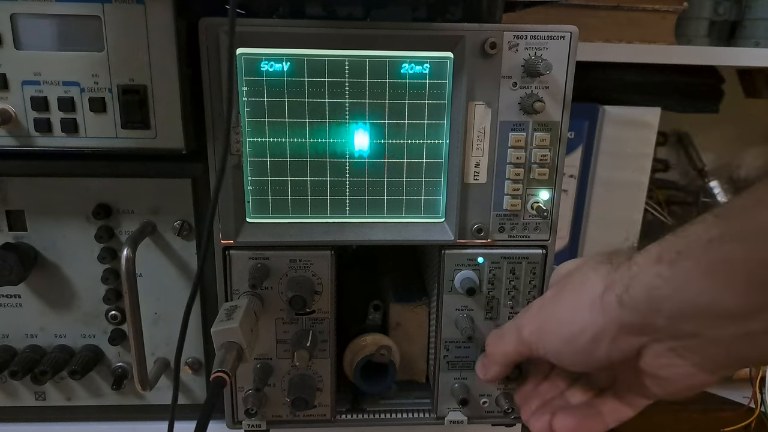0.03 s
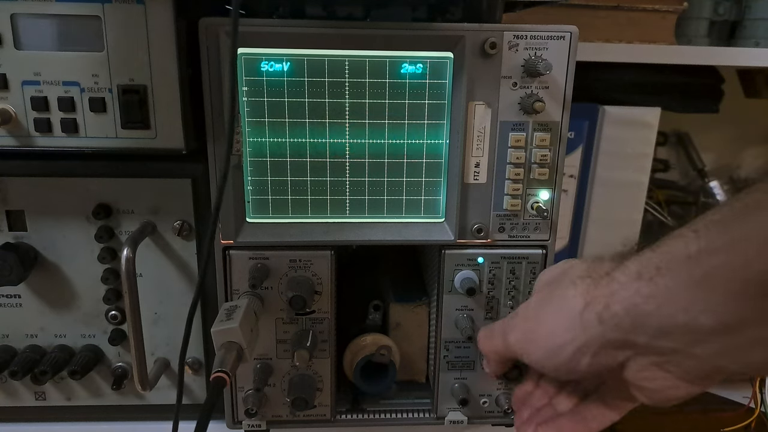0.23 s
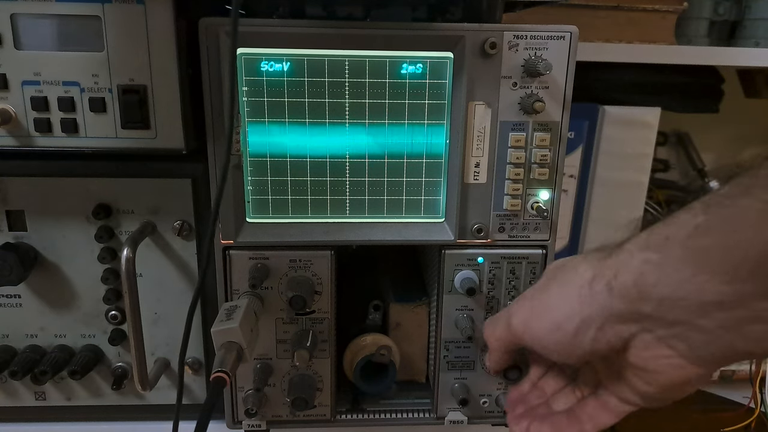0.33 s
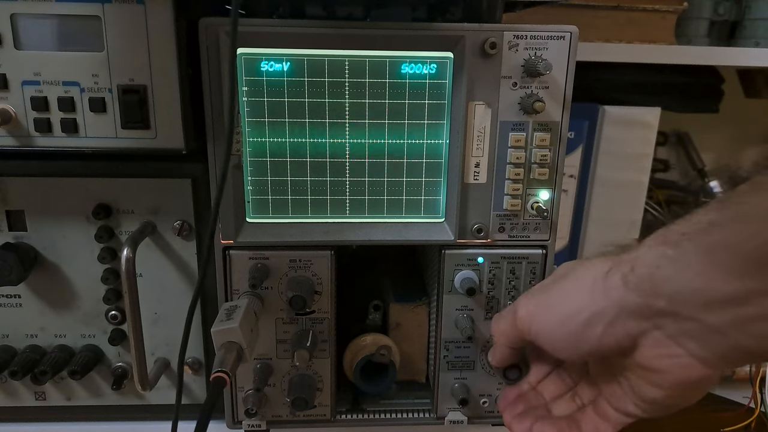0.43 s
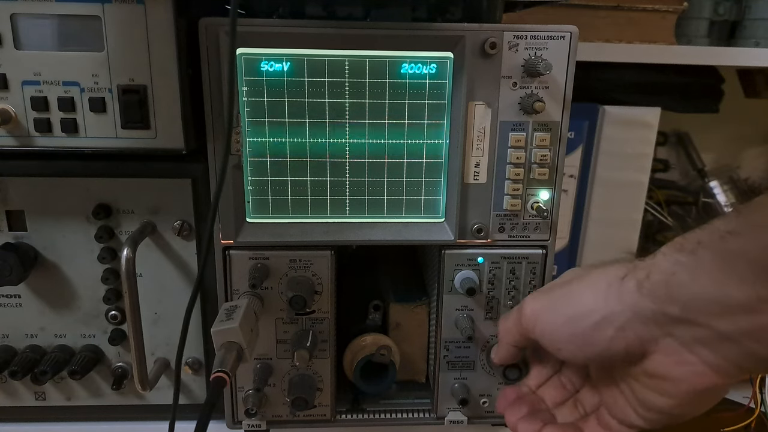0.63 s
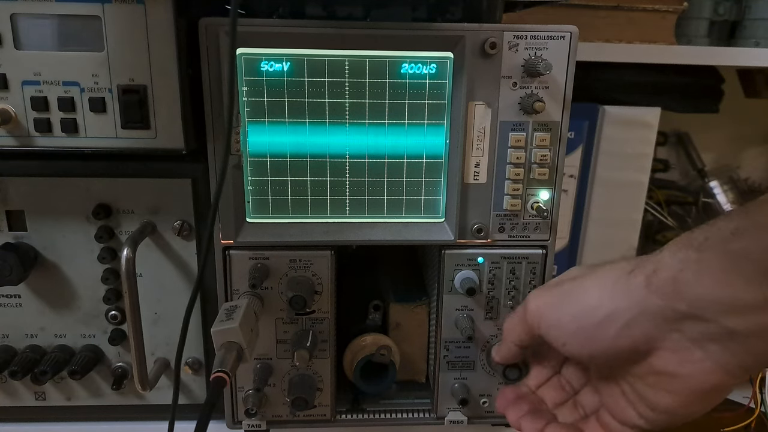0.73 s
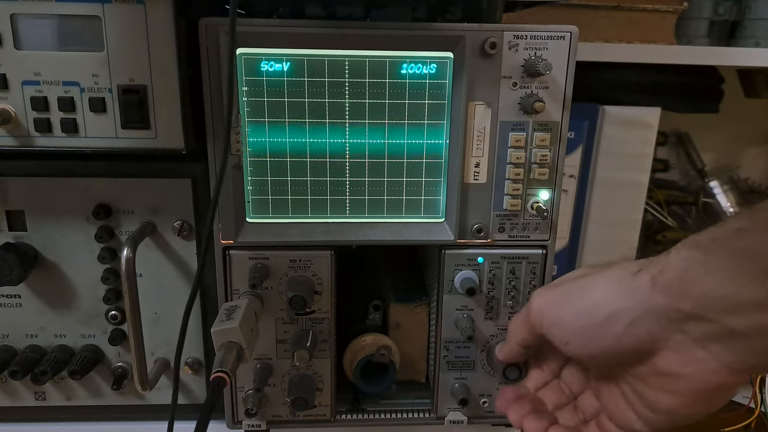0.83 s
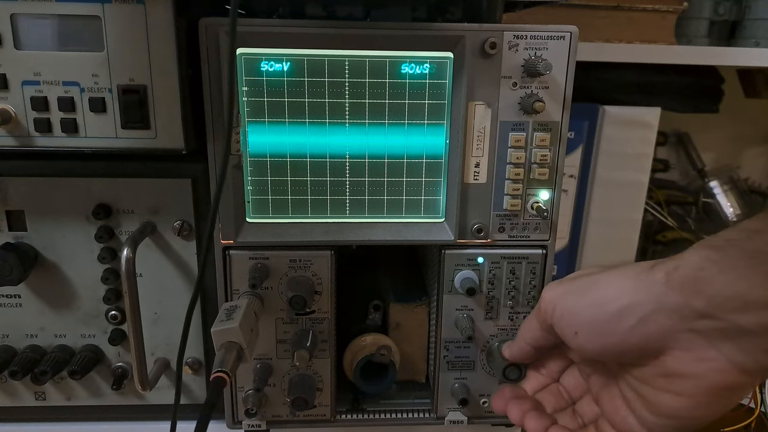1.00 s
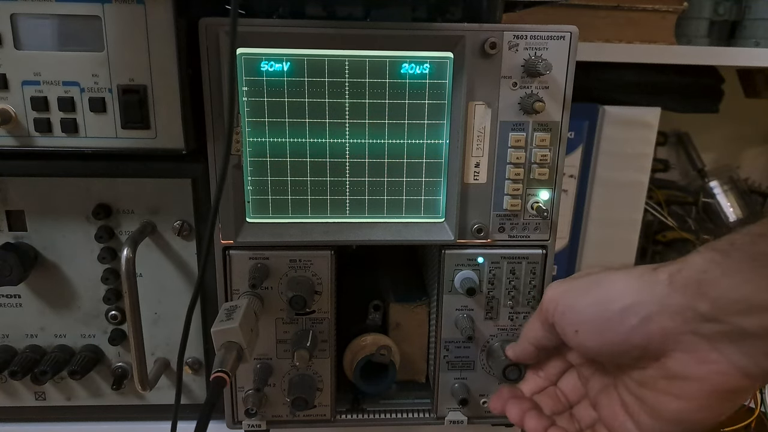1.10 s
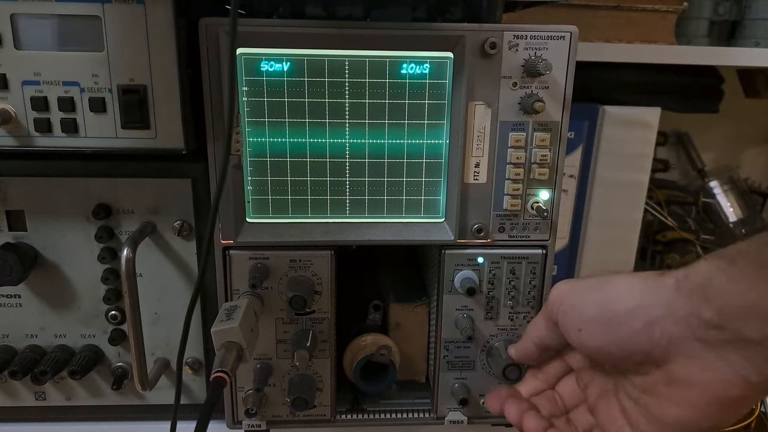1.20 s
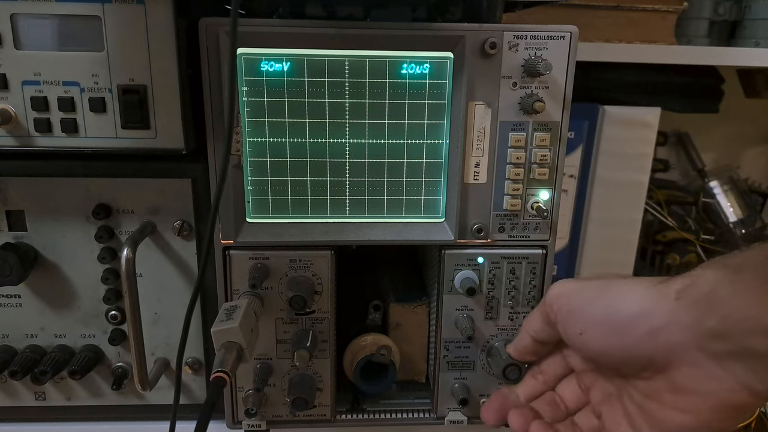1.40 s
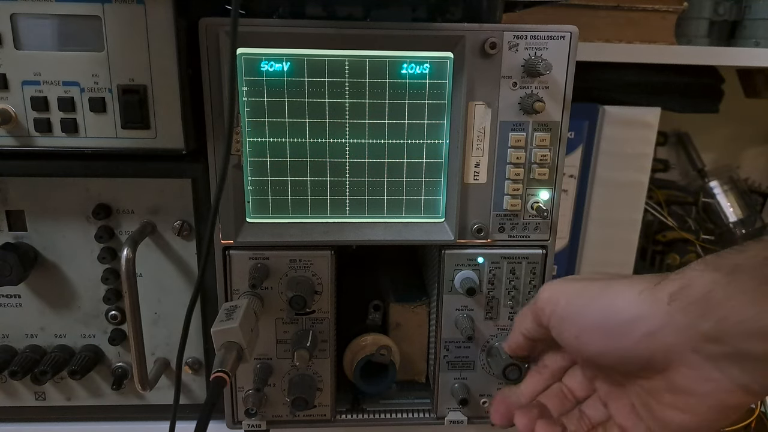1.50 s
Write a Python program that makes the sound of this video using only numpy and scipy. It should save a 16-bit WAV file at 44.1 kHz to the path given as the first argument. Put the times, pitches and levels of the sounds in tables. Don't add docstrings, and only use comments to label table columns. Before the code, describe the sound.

A rotary switch on a bench instrument clicks in a small workshop. After a faint touch at 0.1 s with a low air thump, a hard, bright double snap lands at 0.21 s, then a softer click at 0.27. Faint clicks follow at 0.39, 0.49 and 0.62, then clearer clacks at 0.87, 0.95, 1.11 and 1.25, with brief reflections over quiet low hum.

```python
import sys
import numpy as np
from scipy import signal
from scipy.io import wavfile

SR = 44100
rng = np.random.default_rng(int(sys.argv[2]) if len(sys.argv) > 2 else 0)


def volts(x):
    e = np.asarray(x, float) / 20
    return 10 ** e


def to_wav(sig):
    pcm = np.clip(np.atleast_2d(sig), -1, 1) * 32767
    pcm = np.round(pcm).astype(np.int16)
    wavfile.write(sys.argv[1], SR, pcm.T)


N = 68355

CONTACT_S = [.0935, .2128, .2206, .268, .3909, .3953, .4853, .6200, .8724, .9510, 1.1143, 1.2454]
# peak level in dB, then spring, wafers and case in dB relative to it.
STRENGTH = [(-42.5, -26.5, -8, 3), (-12.5, -13, -16, -14.5), (-12.5, -10.5, -16.5, -9),
            (-25.5, -13, -12, -4.5), (-35.5, -5.5, -13, -10), (-33.5, -6.5, -3.5, -2.5),
            (-28.5, -8.5, -6, -7), (-27, -9.5, -8, -5), (-19.5, -9, -12, -6.5), (-22, -7.5, -10, -7),
            (-18.5, -11, -13, -7), (-24, -11.5, -9.5, -7)]
# frequency in Hz, width in Hz, level in dB.
SPRING = [(4450, 200, -6), (4820, 120, -1), (5390, 250, -4), (6200, 250, -7), (6880, 170, -2),
          (7900, 350, -9), (11100, 250, -5), (12800, 250, -3), (13400, 300, -5)]
# frequency in Hz, width in Hz, level in dB.
WAFER = [(760, 45, -10), (912, 50, -7), (975, 45, -5), (1225, 60, -11), (1600, 120, -9), (1870, 80, -7),
         (2045, 70, -5), (2250, 80, -7), (2490, 80, -5), (2850, 150, -5), (3220, 150, -5)]
# frequency in Hz, width in Hz, level in dB.
CASE = [(129.7, 26.3, -4.5), (165.8, 21, -4.5), (211.2, 27, -4.5), (240, 21, -4.5), (281.9, 20.2, -2.5),
        (367.9, 25, -3.5), (505.5, 23.5, -5), (618.5, 24, -12)]
SWELL_S = [0.00041, .003, 0.018]
RIGHT_DB = [3, 0, -2.5]
# start in seconds, peak level in dB.
TICKS = [
    (.2127, -17),
    (.2205, -15),
    (.391, -35),
    (.4855, -30),
    (.6206, -26),
    (.8727, -21),
    (.9516, -25),
    (1.1146, -20),
    (1.2457, -27),
]
# frequency in Hz, level in dB.
SCATTER = [(120, -13), (500, -1), (1400, 4), (2600, 0), (3800, -1.5), (6000, -3.5), (9500, -5.5),
           (13000, -4), (16000, -33.5)]
# frequency in Hz, time to fall 60 dB in seconds.
ROOM_T60 = [(150, 0.34), (600, 0.44), (1400, 0.29), (2700, 0.38), (4000, 0.31), (9700, 0.27), (15000, 0.23)]
# frequency in Hz, left minus right in dB.
SIDE_BIAS = [(60, 4.5), (180, 3), (550, -3.5), (1650, -2.5), (4970, -6), (15000, -8)]
# frequency in Hz, left-right correlation from -1 to 1.
LIKENESS = [(60, 0.82), (180, 1), (550, 0.67), (1650, 0.025), (4970, -0.0053), (15000, 0.3)]
# start in seconds, level in dB, swing in Hz, length in seconds.
THUMPS = [
    (.110, -36, 75, .022),
    (.132, -36, 52, .04),
    (1.165, -49, 68, .045),
]
# frequency in Hz, density in dB per Hz.
HUM = [(24, -29), (40, -20), (91, -17), (305, -7), (382, -13), (585, -19), (1210, -24), (1520, -47.5),
       (16000, -51.5)]
BAND_EDGES_HZ = 45 * 2 ** (np.arange(0, 26.5) / 3)

SPRING_DB, WAFER_DB, CASE_DB = 10, 10.5, -2
CHATTER_S, WAFER_CHATTER_S, CASE_SHAKE_S = .0009, .0037, .03
CHATTER_LOSS_DB, STRIKE_SPREAD_DB = 6, 2.5
RIGHT_LAG_S = .0002
TICK_HZ, TICK_WIDTH_HZ = 13000, 1700
SCATTER_DB, SCATTER_T60_S, SCATTER_RISE_CYCLES = -1, 0.067, 9.3
ROOM_DB = -5
ECHO_PITCH_DB, ECHO_BLUR = 11, 1.3
RUMBLE_DB, RUMBLE_HZ = -70.5, 73
HUM_DB, HUM_FLICKER_DB = -57.5, 2
TOP_HZ = 15900


def rms_one(x):
    return x / np.sqrt(np.mean(x ** 2) + 1e-20)


def at_hz(points, hz):
    table_hz, values = np.transpose(points)
    return np.interp(np.log(hz), np.log(table_hz), values)


def resonate(x, hz, width_hz):
    r, w = np.exp(-np.pi * width_hz / SR), 2 * np.pi * hz / SR
    return signal.lfilter([0, np.sin(w)], [1, -2 * r * np.cos(w), r * r], x + 1e-18)


def stereo_bands(size):
    white = rng.standard_normal((2, 2, size))
    for k, (low, high) in enumerate(zip(BAND_EDGES_HZ, BAND_EDGES_HZ[1:])):
        band = signal.butter(2, [low, high], "band", fs=SR, output="sos")
        mid, side = signal.sosfilt(band, white[k % 2])
        hz = np.sqrt(low * high)
        alike = np.clip(at_hz(LIKENESS, hz), -1, 1)
        pair = np.sqrt(1 + alike) * mid + np.sqrt(1 - alike) * side * [[1], [-1]]
        yield hz, pair * volts(at_hz(SIDE_BIAS, hz) / 2 * np.array([[1], [-1]]))


def ringing_part(modes, column, spacing_s, swell_s):
    rows = np.column_stack([CONTACT_S, STRENGTH])
    gaps = rng.uniform(.4, 1.6, (len(rows), 4)) * spacing_s
    bounce_s = rows[:, :1] + np.cumsum(gaps, axis=1) - gaps[:, :1]
    where = (bounce_s * SR).astype(int)
    bounce_db = rows[:, [1]] + rows[:, [column]] - CHATTER_LOSS_DB * np.sqrt(np.arange(4))
    out = np.zeros((2, N))
    for hz, width_hz, mode_db in modes:
        clicks = np.zeros(N + SR)
        strike_db = STRIKE_SPREAD_DB * rng.standard_normal((len(rows), 1))
        signs = rng.choice([-1, 1], where.shape)
        np.add.at(clicks, where, volts(bounce_db + mode_db + strike_db) * signs)
        ring = resonate(clicks[:N], hz, width_hz)
        swelled = resonate(ring, hz, 1 / (np.pi * swell_s)) * 2 / (swell_s * SR)
        lag = int(RIGHT_LAG_S * SR) + rng.integers(0, 12) * (hz > 1000)
        out += [swelled, np.roll(swelled, lag)]
    return out / len(modes) ** .5


def switch():
    spring = volts(SPRING_DB) * ringing_part(SPRING, 2, CHATTER_S, SWELL_S[0])
    wafers = volts(WAFER_DB) * ringing_part(WAFER, 3, WAFER_CHATTER_S, SWELL_S[1])
    case = volts(CASE_DB) * ringing_part(CASE, 4, CASE_SHAKE_S, SWELL_S[2])
    side = volts(np.array(RIGHT_DB)[:, None, None] / 2 * [[-1], [1]])
    return side[0] * spring + side[1] * wafers + side[2] * case


def high_ticks():
    s, db = np.transpose(TICKS)
    clicks = np.zeros(N)
    clicks[(s * SR).astype(int)] = volts(db)
    ping = resonate(resonate(clicks, TICK_HZ, TICK_WIDTH_HZ), TICK_HZ, TICK_WIDTH_HZ)
    ping = ping * 2 * np.pi * np.e * TICK_WIDTH_HZ / SR
    return np.array([ping, .3 * np.roll(ping, 20)])


def reflections():
    rows = np.column_stack([CONTACT_S, STRENGTH])
    where = (rows[:, 0] * SR).astype(int)
    out = 0
    for hz, pair in stereo_bands(N):
        share_db = [at_hz([(400, case), (900, wafer), (3200, wafer), (4600, spring)], hz)
                    for spring, wafer, case in rows[:, 2:]]
        kicks = np.zeros(N)
        kicks[where] = volts(2 * (rows[:, 1] + share_db + at_hz(SCATTER, hz)))
        power = 0
        for db, t60 in [(SCATTER_DB, SCATTER_T60_S), (ROOM_DB, at_hz(ROOM_T60, hz))]:
            power = power + volts(2 * db) * signal.lfilter([1], [1, -volts(-120 / (t60 * SR))], kicks)
        r = np.exp(-hz / SCATTER_RISE_CYCLES / SR)
        risen = signal.lfilter([1 - r], [1, -r], power)
        out = out + pair * np.sqrt(risen + 1e-30)
    return out


def pitched(x):
    for hz, width_hz, db in [*CASE, *WAFER, *SPRING]:
        pole = np.exp(-np.pi * ECHO_BLUR * width_hz / SR)
        zero = pole ** volts(max(ECHO_PITCH_DB + db, 0))
        c = np.cos(2 * np.pi * hz / SR)
        x = signal.lfilter([1, -2 * zero * c, zero ** 2], [1, -2 * pole * c, pole ** 2], x)
    return x


def thumps():
    t = np.arange(N) / SR
    low_band = signal.butter(2, [25, RUMBLE_HZ], "band", fs=SR, output="sos")
    out = volts(RUMBLE_DB) * rms_one(signal.sosfilt(low_band, rng.standard_normal(N)))
    for s, db, hz, length in THUMPS:
        swell = np.sin(np.pi * np.clip((t - s) / length, 0, 1)) ** .5
        out = out - volts(db) * swell * np.sin(2 * np.pi * hz * (t - s))
    return np.array([out, .12 * out])


def hum():
    knots = np.arange(0, N + 2000, 2000)
    out = 0
    for hz, pair in stereo_bands(N):
        flicker = np.interp(np.arange(N), knots, rng.standard_normal(len(knots)))
        out = out + pair * volts(at_hz(HUM, hz) + HUM_FLICKER_DB * flicker)
    return volts(HUM_DB) * rms_one(out)


def scene():
    return switch() + high_ticks() + pitched(reflections()) + thumps() + hum()


def band_limit(x):
    return signal.sosfilt(signal.butter(12, 16810, fs=SR, output="sos"), x)


def record(dry):
    low_pass = signal.cheby2(12, 60, TOP_HZ + 700, fs=SR, output="sos")
    mix = signal.sosfilt(low_pass, dry)
    return band_limit(mix)


dry = scene()
out = record(dry)
to_wav(out)
```